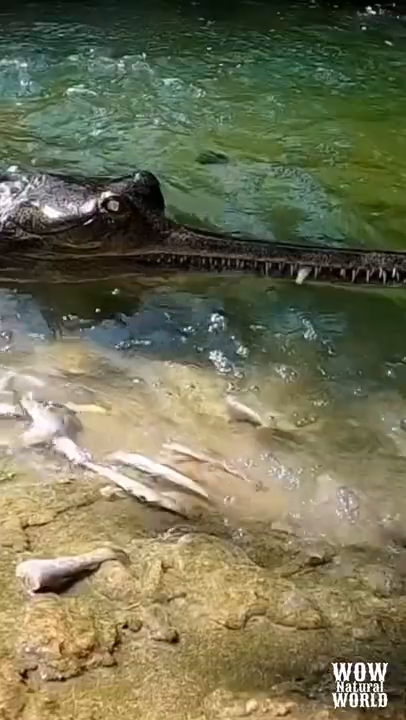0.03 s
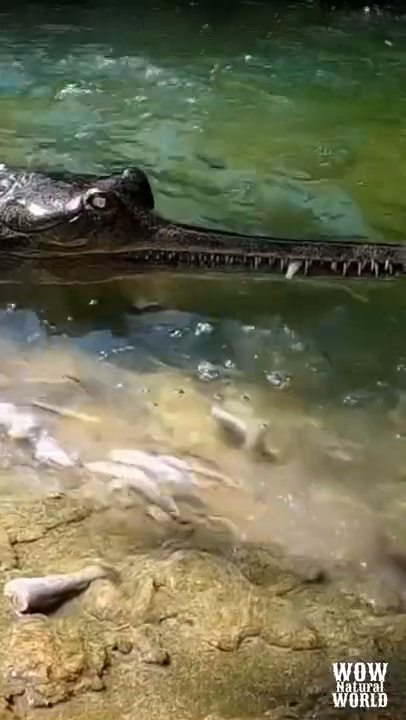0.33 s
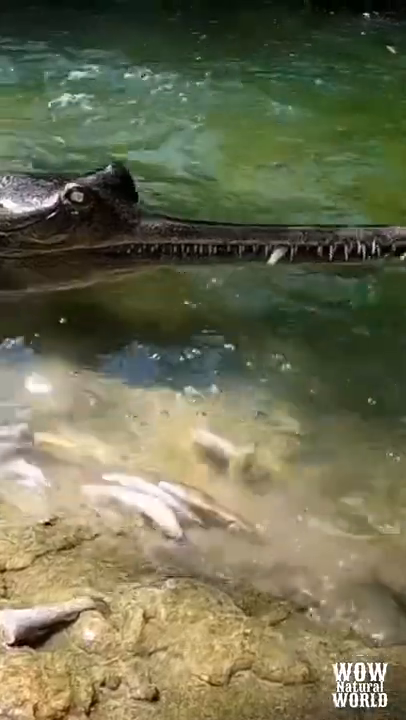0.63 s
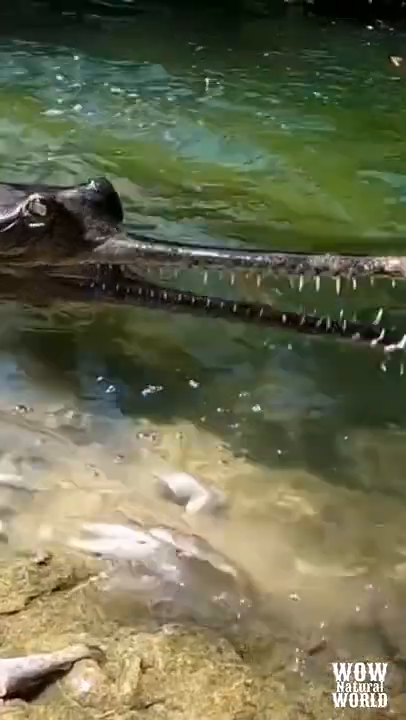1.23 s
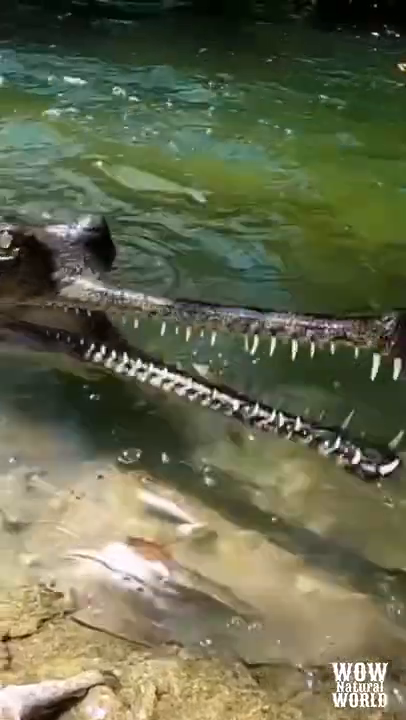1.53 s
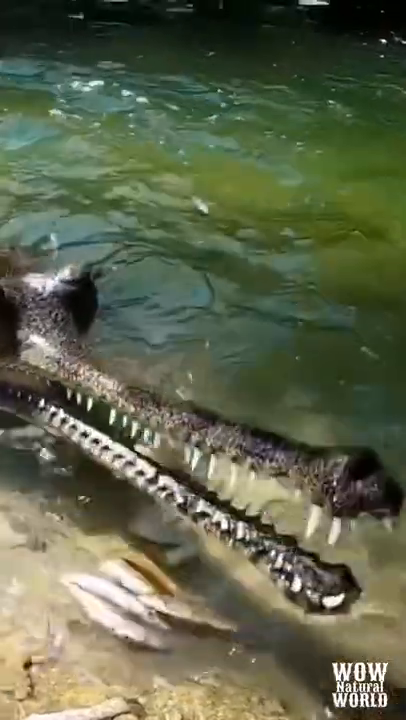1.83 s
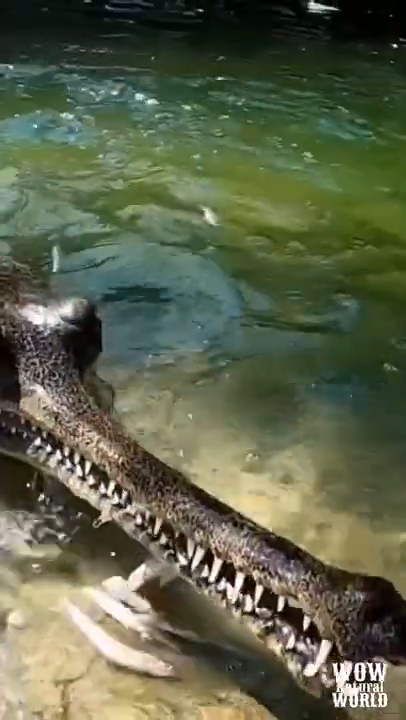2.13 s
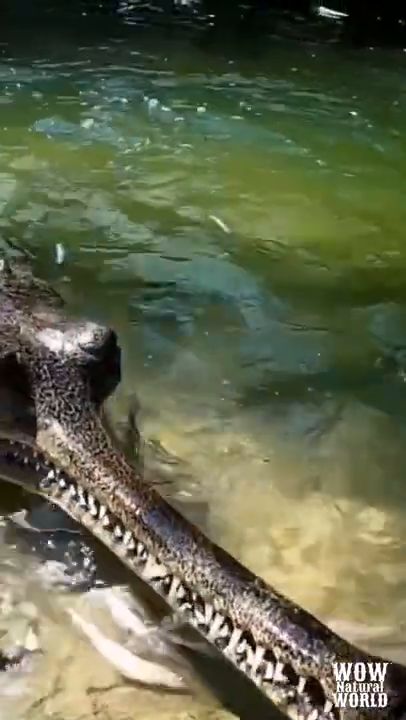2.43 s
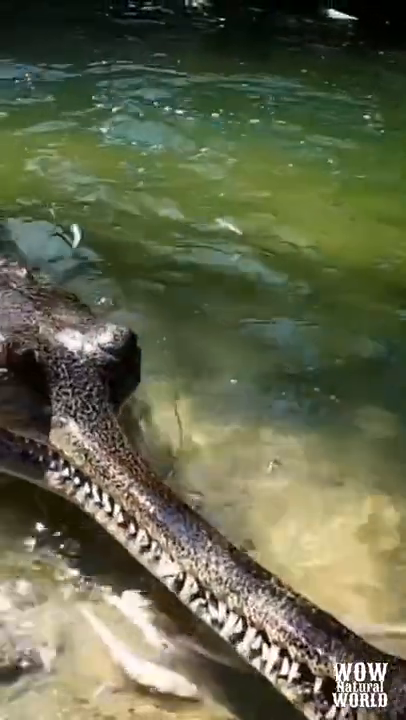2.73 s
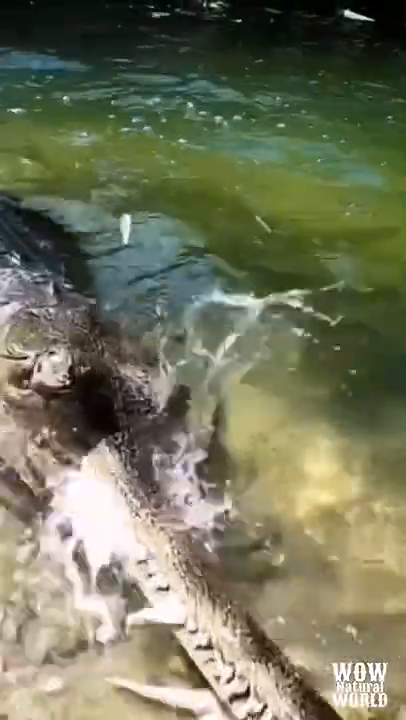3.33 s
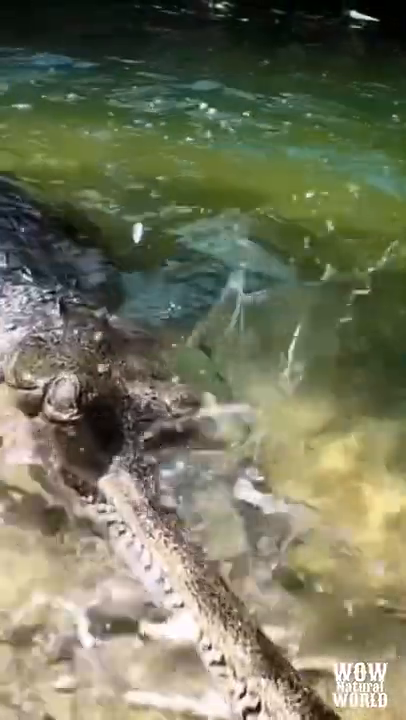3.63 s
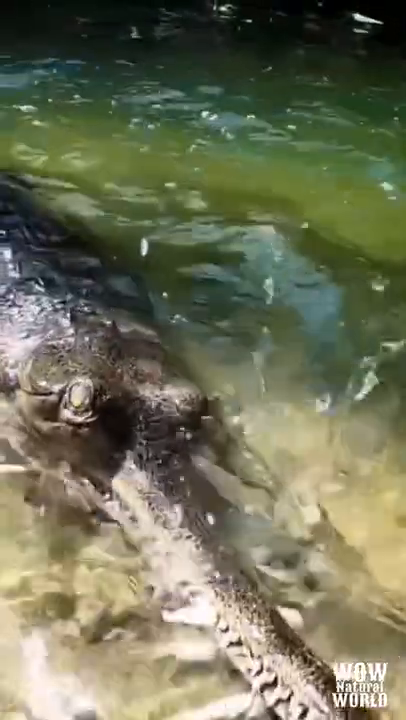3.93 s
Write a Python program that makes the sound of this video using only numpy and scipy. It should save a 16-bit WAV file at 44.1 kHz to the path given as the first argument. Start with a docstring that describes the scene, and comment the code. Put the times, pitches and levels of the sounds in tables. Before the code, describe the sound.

A dull rush of bubbling water fades in and keeps flowing, heard from the edge of a pond. Two small plops come midway; at the end a crocodilian splashes, snaps its jaws shut, and drops fall back.

```python
"""A dull rush of water fades in, with one faint tick, and pours steadily into a pond.
Bubbles gurgle in it and bursting foam adds a faint fizz. A crocodilian dips its snout
with two small plops: pockets of trapped air ringing. Near the end it strikes sideways
at fish: a swish of spray, a gulp of air, a ringing clatter as the jaws shut,
and water falling back."""
import sys
import numpy as np
from scipy import signal
from scipy.fft import rfft, irfft
from scipy.io import wavfile

SR = 44100
rng = np.random.default_rng(int(sys.argv[2]) if len(sys.argv) > 2 else 0)


def unload_wav(signal):
    """Save mono or channel-first audio to the path in sys.argv[1] as 16-bit WAV at rate SR, clipped to [-1, 1]."""
    wavfile.write(
        sys.argv[1],
        SR,
        np.round(np.clip(np.atleast_2d(signal).T, -1, 1) * 32767).astype(np.int16),
    )


N = 176400
TIME = np.arange(N) / SR
BIN_HZ = np.arange(N // 2 + 1) * SR / N


def from_db(db):
    """Turn decibels into a gain."""
    return 10 ** (np.asarray(db) / 20)


def unit_rms(x):
    """Scale a sound so that its average size (rms) is 1."""
    return x / np.sqrt(np.mean(x ** 2) + 1e-20)


def shape(x, spectrum):
    """Filter by (f/Hz, level/dB) points; nothing passes outside them."""
    hz, db = np.transpose(spectrum)
    gain_db = np.interp(np.log(np.maximum(BIN_HZ, 1)), np.log(hz), db, left=-np.inf, right=-np.inf)
    return irfft(rfft(x) * from_db(gain_db), N)


def colour(x, spectrum):
    """Give a noise this tone colour and an rms of 1."""
    return unit_rms(shape(x, spectrum))


def drift(hz):
    """A slow random wobble, about 1 in size."""
    step, warm_up = 40, 2000
    pole = np.exp(-2 * np.pi * hz * step / SR)
    noise = rng.standard_normal(N // step + warm_up + 2)
    slow = signal.lfilter([1], [1, -2 * pole, pole * pole], noise)[warm_up:]
    return np.interp(np.arange(N) / step, np.arange(len(slow)), unit_rms(slow))


def ring(clicks, hz, fade_s):
    """Each click starts a tone that fades by 60 dB in fade_s."""
    pole, angle = from_db(-60 / (fade_s * SR)), 2 * np.pi * hz / SR
    return signal.lfilter([0, np.sin(angle)], [1, -2 * pole * np.cos(angle), pole * pole], clicks + 1e-18)


def random_clicks(per_s, spread_db):
    """Clicks of uneven size at random times."""
    sizes = from_db(spread_db * np.minimum(rng.exponential(1, N), 4)) * rng.choice([-1, 1], N)
    return sizes * (rng.random(N) < per_s / SR)


def churn(shared_db, own_db, shared_hz, own_hz):
    """Churning water: bands of noise swell partly together, partly each on its own."""
    edges_hz = np.r_[0, 90 * 2 ** np.arange(8), SR]
    white = rfft(rng.standard_normal(N))
    together_db = shared_db * drift(shared_hz)
    out = np.zeros(N)
    for low, high in zip(edges_hz, edges_hz[1:]):
        band = irfft(white * ((BIN_HZ >= low) & (BIN_HZ < high)), N)
        out += band * from_db(together_db + own_db * drift(own_hz))
    return out


def gurgles(per_s, low_hz, high_hz, pitches, fade_cycles):
    """Big bubbles ring at random in the pouring water."""
    births = random_clicks(per_s, spread_db=-0.5)
    chosen_pitch = rng.integers(0, pitches, N)
    return unit_rms(sum(ring(births * (chosen_pitch == k), hz, fade_cycles / hz)
                        for k, hz in enumerate(np.geomspace(low_hz, high_hz, pitches))))


# How loud the water is; it fades in and dips briefly near the end: t/s, level/dB
FLOW_LEVEL = [(0.055, -108), (0.07, -60.5), (0.108, -53), (0.122, -46.5), (0.27, -41), (0.33, -40),
              (0.36, -36), (0.48, -34), (0.8, -32.5), (1.6, -32), (2.4, -32), (3.25, -31.6), (3.52, -32),
              (3.6, -34.5), (3.76, -32.5), (3.84, -36.5), (3.95, -30.5)]
# Tone colour of the rushing water: f/Hz, level/dB
RUSH_COLOUR = [(12, -4.5), (27, 3), (50, -1.5), (75, -10), (105, -2), (140, -1), (190, -4.5), (243, 2),
               (300, -0.5), (370, -1.4), (470, -5), (620, -8.5), (850, -14.5), (1380, -21), (1700, -26),
               (2200, -30), (2420, -33), (2600, -36), (2850, -37.5), (3300, -44), (3900, -55.5),
               (4500, -75.5)]
# Tone colour of bursting foam, also the treble of spray and teeth: f/Hz, level/dB
FIZZ_COLOUR = [(6200, -28.5), (7400, -1), (8300, -11), (8800, 4), (9500, -1), (9900, -17), (11700, -27),
               (12230, -11.5), (12700, -22.5), (13600, -8), (14200, -23.5), (15600, -20.5)]
FIZZ_DB, GURGLE_DB, WHINE_DB = -47.5, -11.5, -56.5   # compared with the rush
WHINE_HZ, TICK_S = 12230, 0.268

def inflow():
    """Water pours in: rush, gurgles, fizz and a thin whine all follow one level."""
    water = churn(shared_db=0.24, own_db=1.37, shared_hz=3.9, own_hz=20.2)
    rush = colour(water, RUSH_COLOUR)
    bubbles = from_db(GURGLE_DB) * gurgles(per_s=170, low_hz=150.3, high_hz=544, pitches=18, fade_cycles=16)
    fizz = from_db(FIZZ_DB) * colour(water, FIZZ_COLOUR)
    whine = from_db(WHINE_DB) * np.sqrt(2) * np.sin(2 * np.pi * WHINE_HZ * TIME)
    level = from_db(np.interp(TIME, *np.transpose(FLOW_LEVEL)))
    return level * (rush + bubbles + (fizz + whine) * (TIME > TICK_S))


# Tone colour of the tick: f/Hz, level/dB
TICK_COLOUR = [(300, -1), (2500, -1), (5000, -1), (10000, -18), (15500, -20)]

def tick(db=-45, decay_s=0.0005):
    """One faint, dry tick while the water fades in."""
    envelope = from_db(db) * np.exp(-np.abs(TIME - TICK_S) / decay_s)
    return shape(envelope * rng.standard_normal(N), TICK_COLOUR)


def bubble(start_s, hz, db, decay_s, rise_octaves):
    """An air pocket rings briefly; its pitch can rise as it nears the surface."""
    age = np.maximum(TIME - start_s, 0)
    pitch = hz * 2 ** (rise_octaves * np.minimum(age / decay_s, 4))
    phase = 2 * np.pi * np.cumsum(pitch * (age > 0)) / SR
    onset = 1 - np.exp(-2 * (age * hz) ** 2)   # builds up in about one cycle
    envelope = onset * np.exp(-age / decay_s)
    return from_db(db) * envelope / envelope.max() * np.sin(phase)


# Pockets of air: t/s, f/Hz, peak level/dB, decay/s, pitch rise/octaves per decay time
AIR_POCKETS = [(0.553, 228, -22.5, 0.0073, 0), (.842, 133, -26.5, .012, 0.032),
               (0.962, 256, -26, 0.016, 0.035), (1.1, 132.5, -27.5, 0.029, 0),
               (2.298, 960, -25, 0.0057, 0.0000021), (2.421, 880, -27, 0.0043, 0.064),
               (2.426, 1800, -32, 0.0032, 0.12), (2.428, 2130, -36, 0.0051, .015),
               (2.431, 227, -20.5, 0.016, 0), (2.847, 640, -34, 0.0035, 0),
               (3.192, 150, -21, 0.0066, 0.091), (3.207, 246, -23, 0.0091, 0.064),
               (3.535, 1300, -31, 0.0017, 0.0071), (3.553, 914, -21.5, 0.0037, 0.00082),
               (3.5603, 440, -14, 0.0018, 0.09), (3.562, 239, -16, 0.006, 0),
               (3.562, 109, -18, 0.0043, 0.021), (3.57, 40, -20.5, 0.011, 0),
               (3.625, 546, -19.5, 0.0015, 0.044), (3.642, 94.3, -21.5, 0.017, 0),
               (3.682, 1013, -19, 0.0025, 0.041), (3.682, 1400, -20.5, .003, 0.014),
               (3.756, 244, -21, 0.011, 0.1)]

def plops():
    """Larger pockets of air ring in the inflow and under the snout."""
    return sum(bubble(*pocket) for pocket in AIR_POCKETS)


# Single drops slapping the pond: t/s, peak level/dB, f/Hz
FALLING_DROPS = [(3.5439, -32, 1150), (3.5472, -32, 1930), (3.5568, -32.5, 2260), (3.5655, -31, 1380),
                 (3.5715, -31.5, 2030), (3.6202, -22, 1330), (3.6258, -24, 2420), (3.637, -29, 1370),
                 (3.642, -22.5, 1390), (3.6465, -26.5, 2000), (3.6715, -29, 1260), (3.681, -29.5, 1880),
                 (3.6841, -24.5, 1080), (3.7111, -30, 1150)]

def drops(decay_cycles=2.3):
    """Each drop drives a small bubble under, which rings."""
    return sum(bubble(start_s, hz, db, decay_cycles / hz, rise_octaves=0.03)
               for start_s, db, hz in FALLING_DROPS)


# Sheets of water thrown up: peak t/s, level/dB, attack/s, decay/s, brightness/dB per octave
WATER_SHEETS = [(2.301, -41, 0.0057, 0.021, -2.5), (2.43, -34.5, 0.0084, 0.013, -7),
                (3.539, -39.5, 0.0062, 0.035, 1.5), (3.567, -30, 0.005, 0.011, 1.5),
                (3.622, -31, .001, 0.013, 4), (3.643, -34, 0.0016, 0.004, 2),
                (3.683, -35, 0.016, 0.018, -2), (3.729, -43.5, 0.071, 0.16, 0.5)]
# Tone colour of spray, also of the crack of wet teeth: f/Hz, level/dB
SPRAY_COLOUR = [(150, -4.5), (500, -2.5), (950, 2), (1450, -2.5), (1800, -6.5), (2250, -11.5),
                (2750, -15.5), (3100, -21.5), (3500, -25), (4400, -45), (6500, -53.5)]

def spray(fizz_db=-30, bright_above_hz=1000):
    """Thrown water is a quick swell of tiny droplets; finer ones sound brighter."""
    droplets = random_clicks(per_s=7000, spread_db=1.5)
    fizz = from_db(fizz_db) * colour(droplets, FIZZ_COLOUR)
    out = np.zeros(N)
    for peak_s, db, attack_s, decay_s, brightness in WATER_SHEETS:
        spectrum = [(hz, level + brightness * max(np.log2(hz / bright_above_hz), 0))
                    for hz, level in SPRAY_COLOUR]
        swell = from_db(db) * np.exp(-np.maximum((peak_s - TIME) / attack_s, (TIME - peak_s) / decay_s))
        out += swell * (colour(droplets, spectrum) + fizz)
    return out


# Teeth meeting in turn as the jaws shut: t/s, level/dB
TOOTH_HITS = [(3.6197, -23), (3.6214, -20), (3.6258, -20), (3.6423, -25)]
# Ringing tones heard at each clack, with a thin high whine: f/Hz, level/dB, time to fade by 60 dB/s
CLACK_TONES = [(557, -9, 0.0088), (1248, 0.5, 0.032), (1440, 4.5, 0.022), (1800, -5.5, 0.016),
               (2230, -10.5, 0.045), (2596, -13, 0.057), (2690, -13, 0.025), (3364, -21.5, 0.024),
               (7600, -29, 0.016), (9040, -26, 0.029), (10940, -49, 0.21), (12230, -39, .09)]

def jaws(cushion_s=0.0024, crack_s=0.0024, crack_db=1, treble_db=-14, spread_db=3.5):
    """Each clack of the teeth is a gritty crack with ringing tones; no two ring alike."""
    ringing, crack_level = np.zeros(N), np.zeros(N)
    for start_s, db in TOOTH_HITS:
        age = np.maximum(TIME - start_s, 0)
        onset = from_db(db) * (1 - np.exp(-(age / cushion_s) ** 2))   # a film of water softens the hit
        crack_level += onset * np.exp(-age / crack_s)
        for hz, tone_db, fade_s in CLACK_TONES:
            strength = from_db(tone_db + rng.normal(0, spread_db))
            fade = from_db(-60 * age / fade_s)
            ringing += onset * strength * fade * np.sin(2 * np.pi * hz * age)
    grit = crack_level * rng.standard_normal(N)
    crack = from_db(crack_db) * shape(grit, SPRAY_COLOUR)
    treble = from_db(treble_db) * shape(grit, FIZZ_COLOUR)
    return ringing + crack + treble


def scene():
    """The pond and the animal, heard from the bank in one channel."""
    return (inflow() + plops() + drops() + spray() + jaws() + tick())[None]


HOLLOW_HZ, HOLLOW_OCTAVES, HOLLOW_DB, CUTOFF_HZ = 5220, 0.24, -13.5, 15700

def record(dry):
    """The microphone has a hollow in its treble; then the very top is cut off."""
    hz = np.maximum(np.arange(N + 1) * SR / (2 * N), 1)
    octaves_away = np.log2(hz / HOLLOW_HZ)
    hollow = from_db(HOLLOW_DB * np.exp(-(octaves_away / HOLLOW_OCTAVES) ** 2))
    dulled = irfft(rfft(dry, 2 * N) * hollow, 2 * N)[:, :N]
    low_pass = signal.cheby2(12, 70, CUTOFF_HZ, fs=SR, output="sos")
    return signal.sosfilt(low_pass, dulled)


dry = scene()
out = record(dry)
unload_wav(out)
```